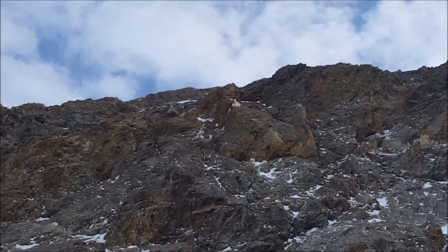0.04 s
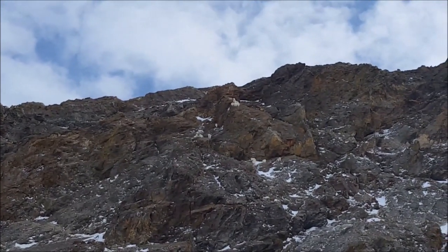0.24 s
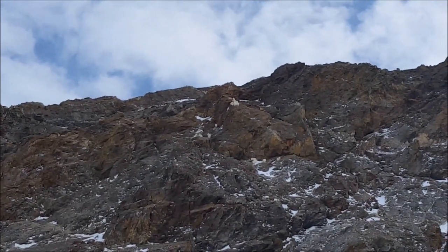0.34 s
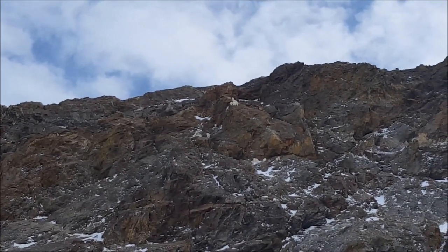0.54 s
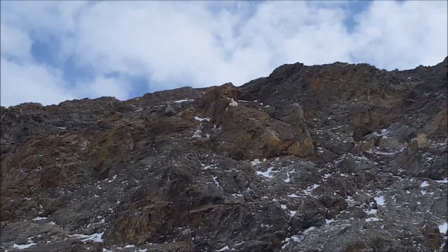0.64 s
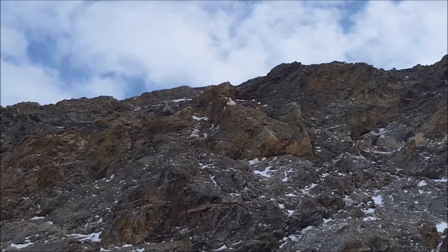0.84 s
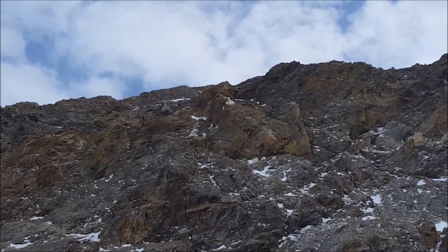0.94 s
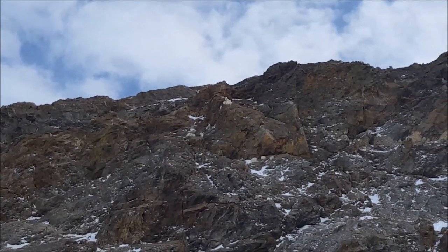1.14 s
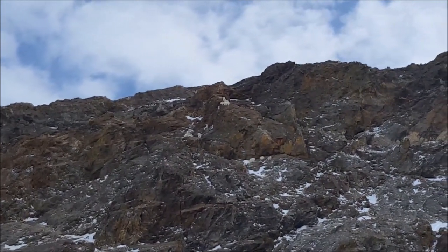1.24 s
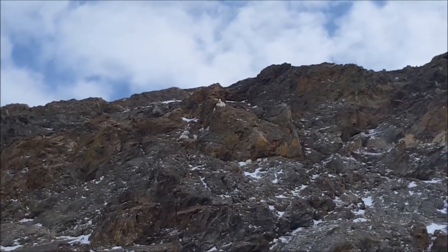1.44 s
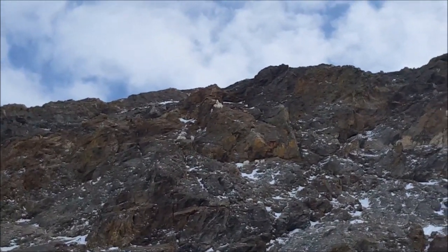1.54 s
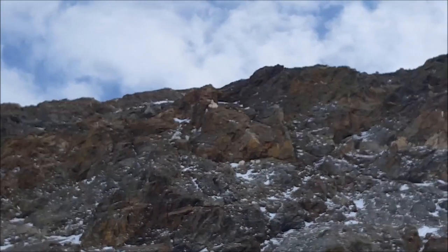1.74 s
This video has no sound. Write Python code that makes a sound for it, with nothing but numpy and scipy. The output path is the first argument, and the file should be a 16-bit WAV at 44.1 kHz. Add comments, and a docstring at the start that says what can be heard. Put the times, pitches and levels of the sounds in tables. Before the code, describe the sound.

Gusty wind rumbles and buffets the microphone, with a brief thump over faint hiss.

```python
"""A low, gusting rumble: wind on an open mountainside, tumbling right over the two ports of a microphone.
Each port rumbles on its own, louder and brighter as the flow quickens. A few hard eddies
buffet the ports, the strongest with a thump. Underneath lies a faint even hiss of far air
and the microphone itself, with one tiny tick in it."""
import sys
import numpy as np
from scipy import signal
from scipy.io import wavfile
from scipy.ndimage import uniform_filter1d

SR = 44100
rng = np.random.default_rng(int(sys.argv[2]) if len(sys.argv) > 2 else 0)


def output_pcm(signal):
    """Save a mono or channel-first signal as 16-bit PCM at the path in sys.argv[1].

    Samples are clipped to [-1, 1] before scaling.
    """
    pcm = np.clip(np.atleast_2d(signal).T, -1, 1) * 32767
    wavfile.write(sys.argv[1], SR, np.round(pcm).astype(np.int16))


N = 79380

# spectrum of the hiss: f/Hz, relative level per Hz/dB
HISS_SPECTRUM = [(300, -4), (1000, 10), (2000, 5.5), (4000, 2), (7500, -2), (9800, -4), (11500, -6),
                 (13500, 2), (15800, 1.5)]
# hard eddies at the ports: t/s, level at the crest/dB, half length/s, corner f/Hz, top f/Hz,
# left minus right/dB
EDDIES = [(0.02, -40, 0.0068, 132, 300, -2), (0.289, -25, 0.0018, 250, 850, -13),
          (0.299, -24.5, 0.0062, 195, 840, 5.5), (.792, -29.5, 0.0051, 417, 570, -20),
          (.852, -19.5, .0065, 320, 1100, -18), (.8585, -14.5, .0034, 310, 1900, 18),
          (0.876, -23.5, 0.01, 320, 750, -19), (1.035, -30, 0.013, 308, 640, 1),
          (1.182, -34, 0.011, 111, 304, -7), (1.372, -34.5, 0.0072, 188, 646, -1.5),
          (1.71, -36.5, 0.004, 110, 298, 5)]
# gusts at the ports, each level counted from its own mean:
# t/s, bass level/dB, middle level/dB, upper level/dB, left minus right/dB
GUSTS = [(0, -46.5, -51, -70.5, 1), (0.029, -41, -39.5, -79, 1.5), (0.059, -51.5, -55, -69, 12),
         (0.126, -29.5, -42.5, -65, -2.5), (0.164, -61.5, -47.5, -83.5, 14), (0.216, -38.5, -35, -57.5, -2),
         (0.309, -35.5, -30, -45.5, -0.5), (.41, -39.5, -38.5, -51, 1), (.465, -38.5, -34.5, -51, -2.5),
         (.5, -46.5, -39, -49.5, -1.5), (0.581, -43.5, -34, -54.5, 3), (0.669, -43.5, -40, -63.5, 1.5),
         (0.746, -44, -54, -70.5, 2.5), (0.779, -46, -35, -56, 3), (.82, -37.5, -38, -52, 0),
         (0.903, -36.5, -32, -37.5, -1.5), (.98, -40.5, -39, -48, -4), (1.04, -40, -28.5, -53, -4.5),
         (1.08, -48.5, -34, -55.5, -4), (1.19, -41.5, -36, -65, 7.5), (1.25, -43, -44, -74.5, -0.5),
         (1.383, -43.5, -35.5, -72, -4), (1.46, -40.5, -58.5, -82, 5.5), (1.495, -46.5, -41.5, -65.5, 5.5),
         (1.59, -53.5, -50, -74, 16), (1.64, -43.5, -43, -64, -2), (1.68, -45, -48.5, -60, 17),
         (1.72, -42, -36.5, -73, -1), (1.8, -40.5, -40, -58.5, 12.5)]
# spectrum of the rumble at mean flow: f/Hz, relative level per Hz/dB
RUMBLE_SPECTRUM = [(22, -33), (40, -20.5), (62, -0.5), (95, .5), (160, 1.5), (250, -6.5), (400, -14),
                   (600, -28), (1000, -45.5), (2000, -58)]
# how strongly each band answers the flow: f/Hz, swing/(dB per dB of gust)
GUST_SWING = [(30, 2.2), (80, 0.5), (180, 1.44), (500, 0.7055), (2000, 0.415)]


def from_db(db):
    """Decibels to gain."""
    return 10 ** (np.asarray(db) / 20)


def rms_one(x):
    """Each channel scaled to rms 1."""
    return x / np.sqrt(np.mean(x ** 2, axis=-1, keepdims=True) + 1e-20)


def at_hz(points, hz):
    """A table read on a log-frequency axis."""
    f, value = np.transpose(points)
    return np.interp(np.log(hz), np.log(f), value)


def butter(x, hz, kind, order=2):
    """Butterworth filter."""
    return signal.sosfilt(signal.butter(order, hz, kind, fs=SR, output="sos"), x)


def drift(rate_hz):
    """A smooth random wander for each port, rms 1."""
    pole = np.exp(-2 * np.pi * rate_hz / SR)
    wander = signal.lfilter([1], [1, -2 * pole, pole * pole], rng.standard_normal((2, 2 * N)))
    return rms_one(wander[:, N:])


def port_noise(correlation):
    """White noise at the two ports, with N extra samples ahead for filters to settle."""
    mid, side = rng.standard_normal((2, 2 * N))
    return np.sqrt((1 + correlation) / 2) * mid + np.sqrt((1 - correlation) / 2) * np.array([side, -side])


def noise_bands(edges_hz, spectrum, correlation):
    """Yields (centre Hz, gain, stereo noise of rms 1) for each band; the squared gains add up to 1."""
    centres_hz = np.sqrt(edges_hz[1:] * edges_hz[:-1])
    gains = from_db(at_hz(spectrum, centres_hz)) * np.sqrt(np.diff(edges_hz))
    gains /= np.linalg.norm(gains)
    white = [port_noise(correlation), port_noise(correlation)]  # neighbouring bands stay unrelated
    for k, hz in enumerate(centres_hz):
        band = butter(white[k % 2], edges_hz[k:k + 2], "band", order=3)
        yield hz, gains[k], rms_one(band[:, N:])


def evened(x, seconds):
    """Noise with its slow chance swells taken out."""
    size = int(seconds * SR)
    power = uniform_filter1d(uniform_filter1d(x ** 2, size), size)
    return x / np.sqrt(np.abs(power) + 1e-12)


def panned(pan_db):
    """Left and right gains of constant power."""
    gains = from_db(np.array([[.5], [-.5]]) * pan_db)
    return gains / np.sqrt(np.mean(gains ** 2, axis=0))


def swell_at(at_s, half_s):
    """A bell-shaped swell of height 1."""
    return np.exp(-.5 * ((np.arange(N) / SR - at_s) / half_s) ** 2)


def hiss(level_db=-71, flicker_db=.3):
    """Far air and the microphone's own hiss, unrelated in the two channels."""
    bands = noise_bands(np.geomspace(300, 17000, 22), HISS_SPECTRUM, correlation=0)
    steady = sum(gain * noise for _, gain, noise in bands)
    return from_db(level_db + flicker_db * drift(rate_hz=8.2)) * steady


def tick(gain_db=-66.5, low_cut_hz=4000):
    """One tiny bright tick in the hiss."""
    treble = butter(rng.standard_normal((2, N)), low_cut_hz, "high")
    return from_db(gain_db) * swell_at(at_s=1.194, half_s=.004) * treble


def buffets(swirl_low_hz=187, bass_cut_hz=92):
    """Each hard eddy hits the ports with a few swings of pressure under a bell-shaped swell."""
    out = 0
    for at_s, level_db, half_s, corner_hz, top_hz, pan_db in EDDIES:
        swirl = butter(port_noise(correlation=-0.29), swirl_low_hz, "high", order=3)
        swirl = butter(swirl, corner_hz, "low", order=3)
        swell = swell_at(at_s, half_s)
        puff = evened(swirl[:, N:], seconds=0.01) * swell
        puff = butter(butter(puff, top_hz, "low"), bass_cut_hz, "high")
        puff = rms_one(puff) * np.sqrt(np.mean(swell ** 2))  # rms near 1 at the crest
        out += from_db(level_db) * panned(pan_db) * puff
    return out


def rumble(mean_flow_db=-38, gust_hz=(80, 226, 547)):
    """Turbulence right at the ports: gusts swell the bands, and all bands of a port flutter together."""
    times_s, *columns = np.transpose(GUSTS)
    *levels_db, pan_db = [np.interp(np.arange(N) / SR, times_s, column) for column in columns]
    flutter_db = 2 * drift(rate_hz=61)
    out = 0
    for hz, gain, noise in noise_bands(np.geomspace(20, 2560, 15), RUMBLE_SPECTRUM, correlation=-0.045):
        # the bass, middle and upper levels rule at gust_hz; bands in between blend them
        shares = [np.interp(np.log(hz), np.log(gust_hz), row) for row in np.eye(3)]
        gust_db = sum(share * (db - db.mean()) for share, db in zip(shares, levels_db))
        swing_db = at_hz(GUST_SWING, hz) * (gust_db + flutter_db)
        out += gain * evened(noise, seconds=0.024) * from_db(swing_db)
    return from_db(mean_flow_db) * out * panned(pan_db)


def scene():
    """Wind on the microphone, close up, over the faint hiss."""
    return rumble() + buffets() + hiss() + tick()


def record(dry):
    """The microphone's signal is cut steeply above 15750 Hz."""
    return signal.sosfilt(signal.ellip(12, .1, 70, 15750, fs=SR, output="sos"), dry)


dry = scene()
out = record(dry)
output_pcm(out)
```